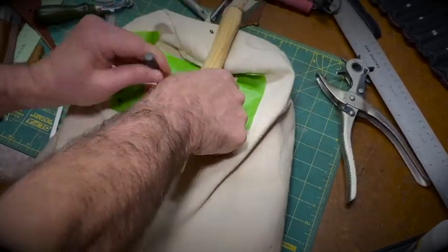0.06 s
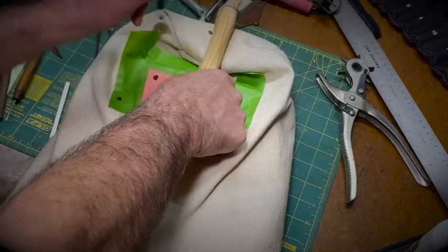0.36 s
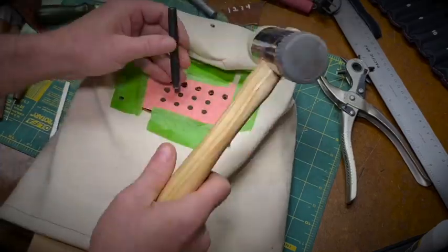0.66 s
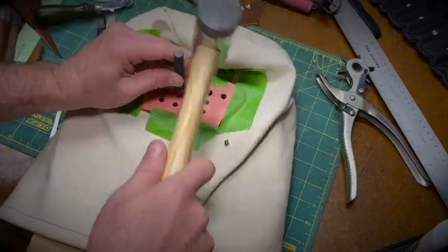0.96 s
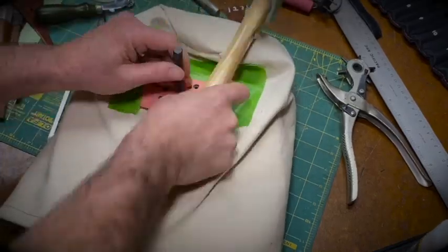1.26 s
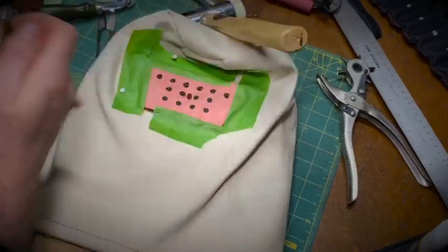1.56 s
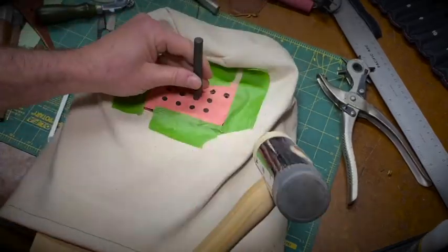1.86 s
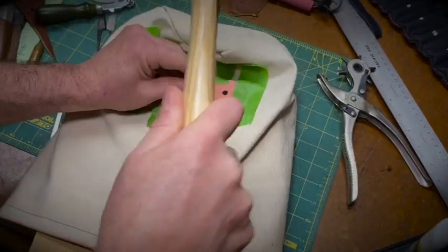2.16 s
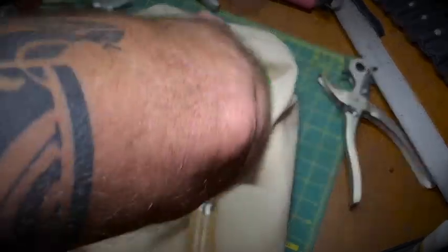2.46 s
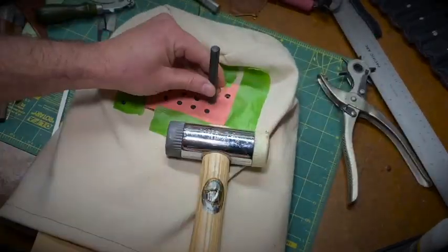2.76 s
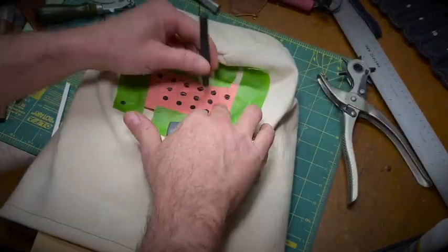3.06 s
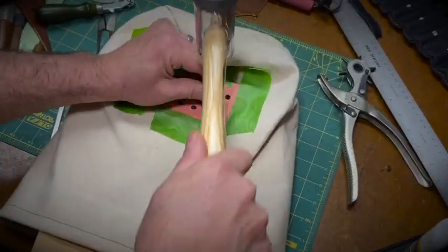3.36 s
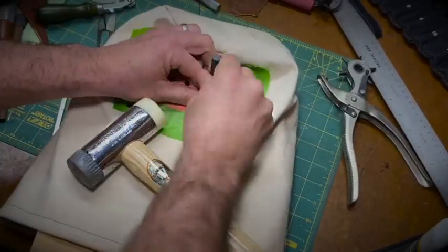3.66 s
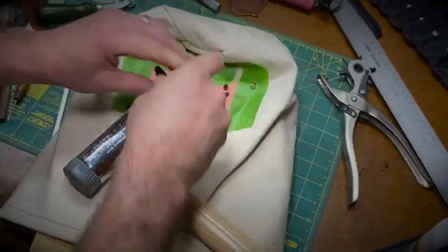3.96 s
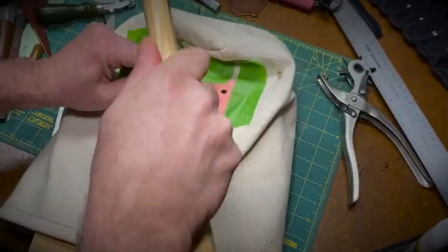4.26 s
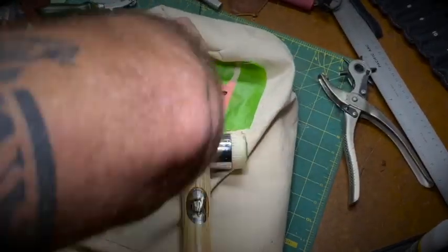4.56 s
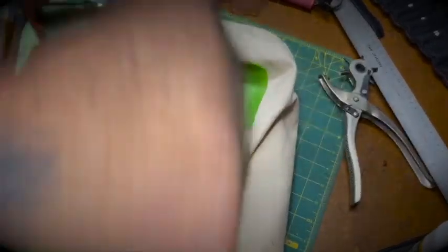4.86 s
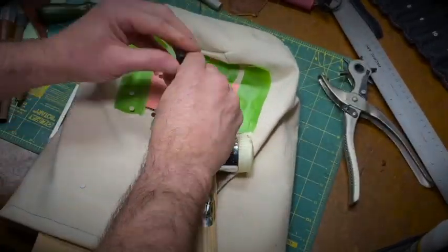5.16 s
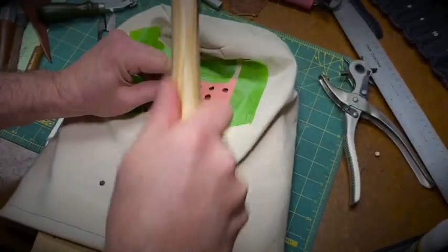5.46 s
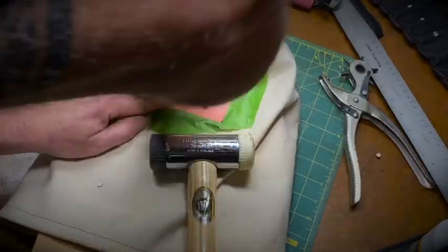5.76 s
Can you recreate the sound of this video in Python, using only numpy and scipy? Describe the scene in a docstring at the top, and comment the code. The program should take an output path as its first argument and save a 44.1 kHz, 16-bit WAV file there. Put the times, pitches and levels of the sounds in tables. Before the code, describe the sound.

Fast-motion hammering on a steel hole punch comes in short, machine-like volleys, separated by tools clinking on a workbench.

```python
"""Punching leather at a workbench

One microphone above the bench. A mallet drives a steel hollow punch through leather and canvas in
fast motion: five volleys of about thirty blows a second, every ring cut short, loud enough to
overload the microphone. Between volleys steel clinks as mallet and punch are put down and picked up,
and hands shift the taped canvas over a low room tone."""
import sys
import numpy as np
from scipy import signal
from scipy.fft import rfft, irfft
from scipy.io import wavfile

SR = 44100
rng = np.random.default_rng(int(sys.argv[2]) if len(sys.argv) > 2 else 0)


def put_to_file(sound):
    """Save the sound as 16-bit audio at rate SR, in the file named by the first command-line argument."""
    columns = np.atleast_2d(sound).T  # one column per channel
    safe = np.clip(columns, -1, 1)
    whole_steps = np.round(safe * 32767)
    wavfile.write(sys.argv[1], SR, whole_steps.astype(np.int16))


N = 257103
HIT_TIME_S = np.arange(8192) / SR  # time axis of a single hit

# Spectra. Columns: frequency_hz, density_db
ROOM_TONE_SPECTRUM = [(15, -23), (27, -1), (50, -2.5), (72, 5.5), (105, -9.5), (220, -11), (280, -3),
                      (370, -11), (520, -8.5), (750, -11.5), (950, -20), (3200, -24.5), (6000, -32.5),
                      (12000, -38)]  # the quiet workshop
ECHO_SPECTRUM = [(30, -25.5), (450, -18.5), (620, -4), (820, -4.5), (1000, -10), (1350, -1), (1700, -3),
                 (2200, 0), (2600, -5.5), (3900, 3.5), (4800, -2), (9000, -3.5), (10600, -0.5),
                 (12000, -7.5)]  # the room answering a hit
CLOTH_SPECTRUM = [(300, -8), (1300, -1), (2200, -7.5), (3300, 5), (4400, 3.5), (5500, -4), (11500, -5.5)]  # tape and canvas rustling
BUMP_SPECTRUM = [(15, -3.5), (40, -0.5), (90, -3), (170, -14.5), (330, -32.5), (1000, -54)]  # forearms bumping the bench
PADDING_SPECTRUM = [(60, -12), (200, -3), (450, -5), (700, 0), (1000, -2), (1350, 1), (1800, -9),
                    (4000, -22), (11000, -36)]  # the dull knock of the padding
RUMBLE_SPECTRUM = [(20, 0.5), (55, -3), (100, -6), (200, -5.5), (280, -6.5), (400, -13.5), (1500, -18),
                   (11000, -31.5)]  # the low rumble under each overloaded blow
RATTLE_SPECTRUM = [(100, -24.5), (600, -21), (1400, -1), (2500, -2.5), (4800, 1), (6500, 0), (9500, -1.5),
                   (12000, -3)]  # tool against tool
TICK_SPECTRUM = [(100, -29), (800, -23), (1700, -19), (2600, 1), (4100, 9.5), (5600, -7.5), (7000, -1.5),
                 (10500, -7), (12000, -14)]  # a sharp contact on steel
CRACK_SPECTRUM = [(30, -16), (200, -14), (420, -20), (750, -2.5), (1000, -4), (1500, -3), (2700, 1.5),
                  (4000, -1), (5000, -2), (8000, -2.5), (10500, -6), (12000, -4.5)]  # the mallet's impact

# Ringing modes. Columns: pitch_hz, level_db, t60_s
BOARD_MODES = [(179, -5, 0.08), (290, -6.5, 0.029), (666.6, -3.5, 0.036), (1280, -3.5, 0.028)]  # the bench top under its cloth
TOOL_MODES = [(1331, -24, .05), (1738, -14, .022), (3100, -21, .012), (4750, -9.5, 0.015), (6400, -9, .016),
              (9400, -18.5, .014)]  # the lifted tools
STEEL_MODES = [(4350, -8, 0.011), (4176, -22, 0.022), (4960, -11.5, 0.0038), (5280, -9, 0.0077),
               (10350, -11, 0.0081)]  # loosely held steel
HEAD_MODES = [(1135, -11, 0.015), (1350, -10, 0.016), (1875, -15, 0.022), (2245, -14, .028),
              (2480, -12.5, 0.017), (3100, -11, .022), (4740, -15.5, .022)]  # the mallet head as it is set down
BLOW_MODES = [(646, -18, .024), (799, -25, .039), (1236.6, -4, .0115), (1225, -19.5, 0.033),
              (1405, -16, .037), (1385.3, 7, 0.007), (1493.2, 2.5, 0.0089), (1825, -20.5, .028),
              (2223, -16, 0.032), (2310, -27.5, 0.03), (2894, -22.5, .04), (3153, -18.5, 0.028),
              (3517, -24, 0.031), (3740, -14.5, 0.026), (3960, -14, 0.031), (4008, -12.5, .02),
              (4226, -12.5, .021), (4367, -21, 0.023), (5230, -22.5, 0.024)]  # mallet, punch and bench together

# The drifting level of the room tone. Columns: time_s, level_db
ROOM_TONE_LEVELS = [(0, -62.5), (1.9, -66.5), (3.101, -67.5), (4.099, -69.5), (5.2, -69), (5.83, -65.5)]
# Hands passing over the taped canvas. Columns: start_s, length_s, rustle_db, bump_db
HAND_STROKES = [(0.0, 0.098, -66.5, -63), (.14, 0.37, -73, -74), (.62, 0.23, -81.5, -75),
                (1.269, 0.051, -61, -62), (1.355, .1, -67.5, -64), (1.458, 0.043, -57, -64.5),
                (1.55, 0.13, -76, -68), (2.3, 0.22, -71.5, -56.5), (2.543, 0.032, -68, -67),
                (2.658, 0.064, -72.5, -78), (2.847, 0.21, -75, -64), (3.121, 0.054, -79, -57.5),
                (3.723, .1, -68, -61), (3.828, 0.072, -61, -54), (3.986, 0.11, -75, -65.5),
                (4.196, 0.024, -65, -80), (4.54, 0.41, -74, -53.5), (5.02, .07, -72.5, -73),
                (5.234, .06, -70, -66), (5.68, 0.14, -74, -44)]

# Levels in the tables below are relative; each source adds its own gain.
# The clearest snaps of tape and canvas under the fingers. Columns: start_s, level_db
TAPE_SNAPS = [(1.461, -47), (1.687, -42), (2.401, -48), (2.497, -42.5), (3.015, -48.5), (3.102, -45),
              (3.702, -42.5), (4.721, -45), (4.827, -44), (4.901, -41.5), (5.6985, -45)]
# A forearm landing on the bench. Columns: start_s, level_db
FOREARM_THUMPS = [(4.645, -43.5), (4.674, -47), (4.869, -42), (5.685, -35.5), (5.723, -44)]
# Tools knocking together as the mallet is lifted. Columns: start_s, level_db
TOOL_KNOCKS = [(.369, -27.5), (0.3915, 5), (0.4097, -4), (0.4269, -13), (0.4865, -11.5), (.5040, -17.5),
               (.5191, -14), (0.5524, -7.5)]
# Steel clinking as mallet and punch are handled. Columns: start_s, level_db, thud_db, ring_db
STEEL_CLINKS = [(1.5535, -25, -18, -21), (1.6944, -29.5, -25, -23.5), (1.7195, -33.5, -37, -27),
                (2.2566, -10, -10, -24), (3.323, -19.5, -13, -21.5), (3.6286, 4.5, -19, -25),
                (4.211, -31.5, -13.5, -15), (4.5056, 7, -24.5, -36), (4.9699, -7, -19.5, 6.5),
                (4.9864, -1.5, -23, 1), (5.5783, 5.5, -21, -18.5)]
# The mallet knocking on the padded bench. Columns: start_s, force_db, hardness_db, thud_db
MALLET_KNOCKS = [(1.0016, -18.5, -3, -13.5), (1.5062, -0.5, -0.5, -35), (1.5373, -28, -9, -13),
                 (1.5565, -29, -15, -13), (1.6232, -44, -1, -25), (3.851, -19.5, -8.5, -12),
                 (4.8644, -31.5, -6.5, -7), (5.312, -28, 1, -7), (5.787, -38, -4.5, 1)]
# Runs of blows on the punch.
# Columns: start_s, blow_count, first_gap_s, beat_s, force_db, echo_db, rumble_db
BLOW_VOLLEYS = [(1.046, 7, 0.032, 0.032, -0.5, -1.5, -37), (2.0038, 7, .0334, .0325, -0.1, -10, -38),
                (3.3822, 7, 0.036, 0.032, 0, -11.5, -35.5), (4.2667, 7, .0337, .03225, -0.27, -8, -36.5),
                (5.3641, 6, 0.034, 0.033, .5, -2.5, -32)]


def amp(db):
    """Decibels to gain."""
    return 10 ** (np.asarray(db) / 20)


def unit(x):
    """Scales to rms 1."""
    return x / np.sqrt(np.mean(x ** 2) + 1e-20)


def colour(x, spectrum):
    """Shapes x by a spectrum, at rms 1."""
    hz, db = np.transpose(spectrum)
    bins_hz = np.fft.rfftfreq(len(x), 1 / SR)
    gain = amp(np.interp(np.log(bins_hz + 1), np.log(hz), db))
    return unit(irfft(rfft(x) * gain, len(x)))


def noise(spectrum, size=len(HIT_TIME_S)):
    """Fresh noise of the given spectrum."""
    return colour(rng.standard_normal(size), spectrum)


def band(x, side, hz):
    """The "low" or "high" side of x, split at hz."""
    return signal.sosfilt(signal.butter(2, hz, side, fs=SR, output="sos"), x)


def decay(t60_s):
    """Envelope that loses 60 dB in t60_s."""
    return np.exp(-np.log(1000) * HIT_TIME_S / t60_s)


def damped_sine(hz, t60_s):
    """One vibration dying away."""
    return np.sin(2 * np.pi * hz * HIT_TIME_S) * decay(t60_s)


def ring(modes, spread_db, detune):
    """Damped modes, neighbours swinging opposite ways; each contact shifts their levels and pitch."""
    shifts_db = spread_db * rng.standard_normal(len(modes))
    pitch = 1 + detune * rng.standard_normal()
    return sum((-1) ** k * amp(db + shifts_db[k]) * damped_sine(hz * pitch, t60_s)
               for k, (hz, db, t60_s) in enumerate(modes))


def click(spectrum):
    """A single sharp contact, with peak 1."""
    pulse = colour(signal.unit_impulse(len(HIT_TIME_S), 10), spectrum) * decay(.02)
    return pulse / np.max(abs(pulse))


def add(mix, start_s, sound):
    """Mixes a sound in at start_s."""
    part = mix[round(start_s * SR):][:len(sound)]
    part += sound[:len(part)]


def room_tone():
    """The workshop's quiet, low background."""
    level_db = np.interp(np.arange(N) / SR, *np.transpose(ROOM_TONE_LEVELS))
    return amp(level_db) * noise(ROOM_TONE_SPECTRUM, N)


def room_echo(reflections, likeness=.65):
    """Echoes swell behind a hit and die; most of their pattern repeats from hit to hit."""
    wash = np.sqrt(likeness) * reflections + np.sqrt(1 - likeness) * noise(ECHO_SPECTRUM)
    return wash * decay(.04) * (1 - decay(.029))


def hands(attack_s=.015, release_s=.017, snaps_per_s=200, spread_db=5.5, snap_share=.66):
    """With each stroke canvas and tape rustle in small snaps while the forearms bump the bench."""
    t, rustle, bump = np.arange(N) / SR, np.zeros(N), np.zeros(N)
    for start_s, length_s, rustle_db, bump_db in HAND_STROKES:
        end_s = start_s + length_s
        stroke = np.interp(t, [start_s - attack_s, start_s, end_s, end_s + release_s], [0, 1, 1, 0])
        rustle = np.maximum(rustle, stroke * amp(rustle_db))
        bump = np.maximum(bump, stroke * amp(bump_db))
    strengths = amp(spread_db * np.minimum(rng.exponential(1, N), 3.5))
    snaps = strengths * (rng.random(N) < snaps_per_s / SR)
    grain = unit(signal.oaconvolve(snaps, decay(.017))[:N])
    cloth = unit(noise(CLOTH_SPECTRUM, N) * (1 - snap_share + snap_share * grain))
    return rustle * cloth + amp(-5.5) * bump * noise(BUMP_SPECTRUM, N)


def tape():
    """Creases in the tape and canvas let go with a tiny snap."""
    out = np.zeros(N)
    for start_s, level_db in TAPE_SNAPS:
        snap = noise(CLOTH_SPECTRUM) * (decay(.0062) + amp(-19) * decay(.036))
        add(out, start_s, amp(level_db - 9) * snap)
    return out


def forearm():
    """A soft push that rocks the bench for about one swing."""
    out = np.zeros(N)
    swing = damped_sine(hz=38, t60_s=.064) * (1 - decay(.02))
    for start_s, level_db in FOREARM_THUMPS:
        add(out, start_s, amp(level_db + 7) * swing)
    return out


def bench_thud():
    """The bench answering a light knock: a short ring of the board, muffled by the padding."""
    board = ring(BOARD_MODES, spread_db=1.5, detune=.02)
    return board + amp(-6) * noise(PADDING_SPECTRUM) * decay(.031)


def tool_clatter(rebound_s=.005, rebound_db=-10, slide_s=(.468, .545), chatter_per_s=61, chatter_db=-29):
    """Tools knock together, each knock rebounding once, and chatter lightly as they slide."""
    out = np.zeros(N)
    rebounds = [(s + rebound_s, db + rebound_db) for s, db in TOOL_KNOCKS]
    chatter = [(s + rng.random() / chatter_per_s / 2, chatter_db)
               for s in np.arange(*slide_s, 1 / chatter_per_s)]
    for start_s, level_db in TOOL_KNOCKS + rebounds + chatter:
        envelope = amp(-5.5) * decay(.009) + amp(-12.5) * decay(.051)
        tick = amp(.5) * click(RATTLE_SPECTRUM) + noise(RATTLE_SPECTRUM) * envelope
        tools = amp(-2) * ring(TOOL_MODES, spread_db=1.25, detune=.027)
        add(out, start_s, amp(level_db - 13.5) * (tick + tools))
    return out


def steel_clinks():
    """Sharp steel clinks with a faint room tail and a soft thud as mallet and punch are handled."""
    out = np.zeros(N)
    for start_s, level_db, thud_db, ring_db in STEEL_CLINKS:
        envelope = amp(-10.5) * decay(.0058) + amp(-27) * decay(.048)
        tick = amp(4) * click(TICK_SPECTRUM) + noise(TICK_SPECTRUM) * envelope
        steel = amp(ring_db + 1.5) * ring(STEEL_MODES, spread_db=.79, detune=.0049)
        thud = amp(thud_db - 10) * bench_thud()
        add(out, start_s, amp(level_db - 10.5) * (tick + steel + thud))
    return out


def mallet_knocks(reflections):
    """The mallet meets the padded bench: its head slaps and rings briefly over a dull thud."""
    out = np.zeros(N)
    for start_s, force_db, hardness_db, thud_db in MALLET_KNOCKS:
        slap = amp(2.5) * click(CRACK_SPECTRUM) + noise(CRACK_SPECTRUM) * decay(.02)
        slap += amp(-13) * room_echo(reflections)
        head = band(ring(HEAD_MODES, spread_db=1.5, detune=.006), "low", hz=3600)
        contact = amp(hardness_db) * (amp(-4) * head + amp(-9) * slap)
        add(out, start_s, amp(force_db) * (contact + amp(thud_db - 7) * bench_thud()))
    return out


def mallet_blow(reflections, echo_db, rumble_db):
    """One overloaded blow on the punch: crack, brief ring and echo over a short low thump and rumble."""
    crack = amp(-9.5) * noise(CRACK_SPECTRUM) * decay(.015)
    rumble = amp(-5) * noise(RUMBLE_SPECTRUM) * decay(.18)
    thump = amp(8.5) * damped_sine(hz=70, t60_s=.014)
    low_end = amp(rumble_db) * (rumble + thump) + amp(-34) * damped_sine(hz=270, t60_s=.027)
    board = amp(-45) * ring(BOARD_MODES, spread_db=1.2, detune=.02)
    # Such small parts radiate little bass.
    ringing = band(ring(BLOW_MODES, spread_db=.5, detune=.003), "high", hz=500)
    echo = amp(echo_db - 6.5) * room_echo(reflections)
    return crack + ringing + echo + low_end + board


def mallet_volleys(reflections, jitter_s=.00022, jitter_db=.5, seat_force_db=-.96, seat_rumble_db=-5.5):
    """Slightly uneven blows: the first only seats the punch, the rest land harder with more low end."""
    out = np.zeros(N)
    for start_s, blow_count, first_gap_s, beat_s, force_db, echo_db, rumble_db in BLOW_VOLLEYS:
        for k in range(blow_count):
            late, harder = rng.standard_normal(2)
            offset_s = 0 if k == 0 else first_gap_s + (k - 1) * beat_s + jitter_s * late
            slack = np.exp(-k)  # gone within a few blows
            blow = mallet_blow(reflections, echo_db * slack, rumble_db + seat_rumble_db * slack)
            level_db = force_db + seat_force_db * slack + jitter_db * harder
            add(out, start_s + offset_s, amp(level_db) * blow)
    return out


def scene():
    """Everything at one microphone above the bench."""
    reflections = noise(ECHO_SPECTRUM)
    mallet = mallet_volleys(reflections) + mallet_knocks(reflections)
    return (mallet + steel_clinks() + tool_clatter() + tape() + hands() + forearm() + room_tone())[None]


def record(dry, ceiling=.58, cutoff_hz=11850):
    """The overloaded microphone flattens the loudest peaks; then the top of the treble is cut off."""
    squashed = dry / (1 + (dry / ceiling) ** 4) ** (1 / 4)
    lowpass = signal.firwin(121, cutoff_hz, window=("kaiser", 8), fs=SR)
    return signal.oaconvolve(squashed, lowpass[None], "same")


dry = scene()
out = record(dry)
put_to_file(out)
```